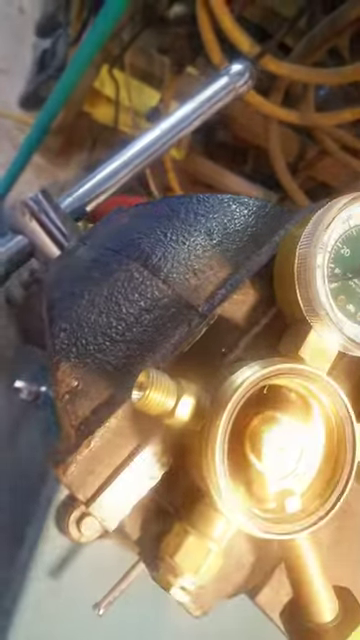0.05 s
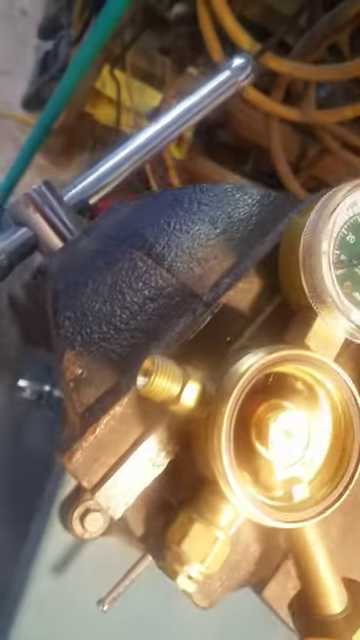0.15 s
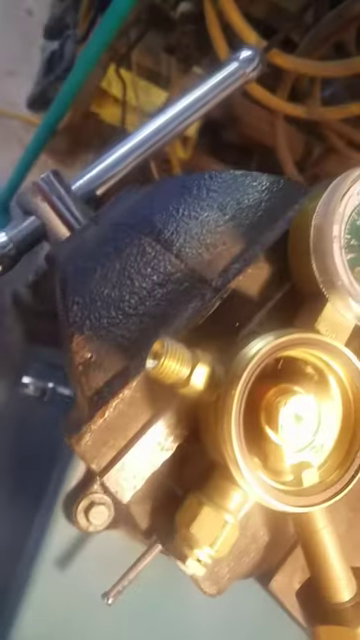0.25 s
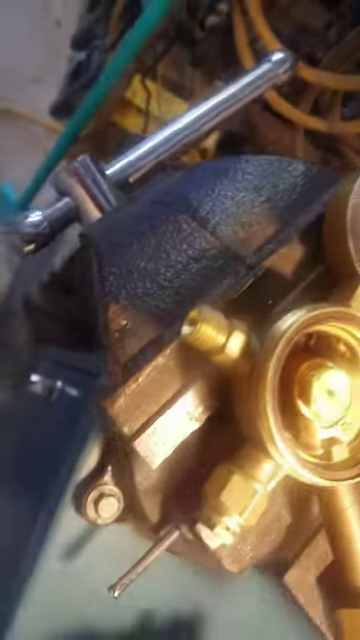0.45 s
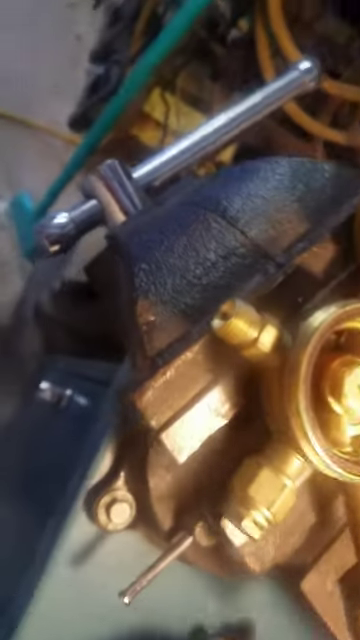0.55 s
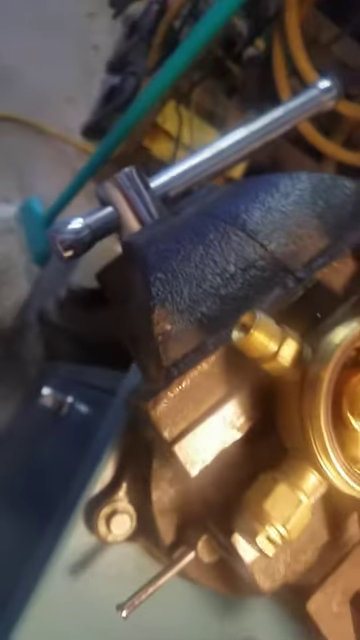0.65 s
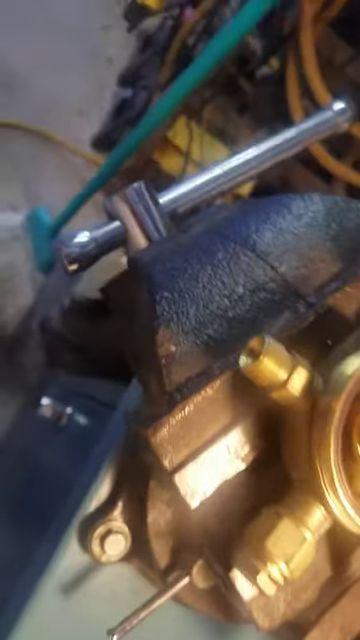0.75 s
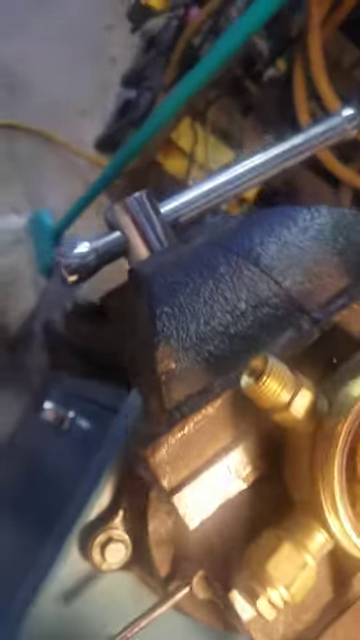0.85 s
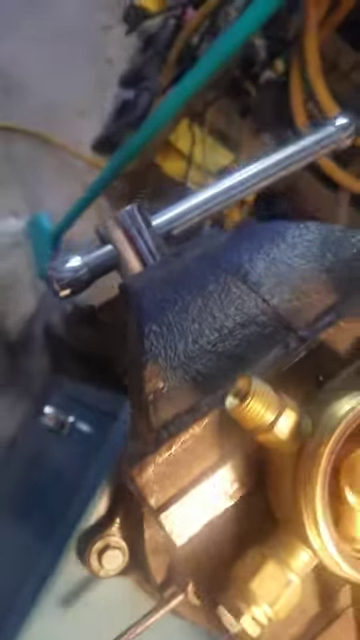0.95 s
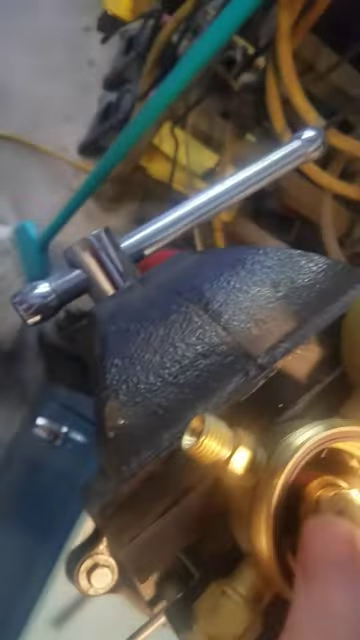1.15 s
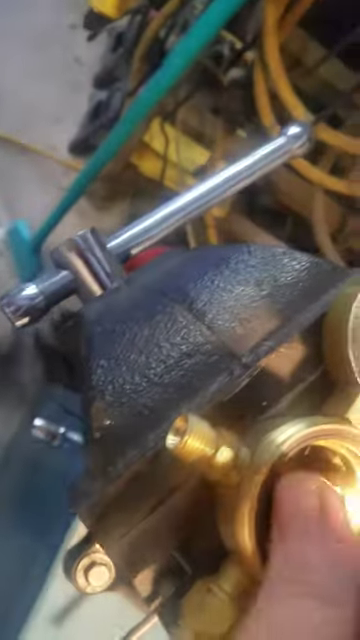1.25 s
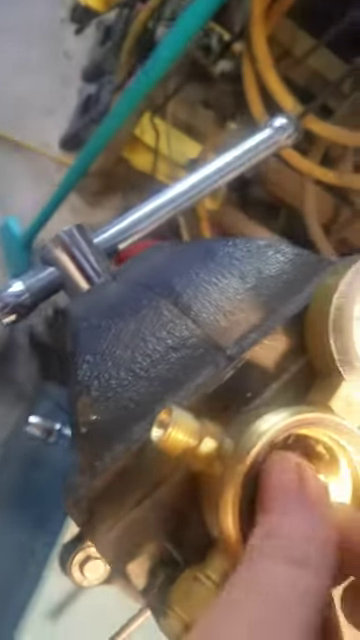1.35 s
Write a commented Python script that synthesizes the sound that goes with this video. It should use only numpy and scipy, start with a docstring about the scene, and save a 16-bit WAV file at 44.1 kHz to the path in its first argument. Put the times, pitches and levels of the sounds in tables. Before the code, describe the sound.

A metal gas regulator clicks sharply and rattles briefly over a faint, steady hiss.

```python
"""A sharp click, then a quick rattle: a metal gas regulator handled close to the microphones in a workshop.
Each contact is a crack, a short clatter of parts and a faint ring of the body, in a small room.
A loose part gives a tiny double tick, then the handle knocks softly a few times.
A steady low rush, rumble and faint hiss lie underneath."""
import sys
import numpy as np
from scipy import signal
from scipy.fft import rfft, irfft, next_fast_len
from scipy.io import wavfile
from scipy.ndimage import map_coordinates

SR = 44100
rng = np.random.default_rng(int(sys.argv[2]) if len(sys.argv) > 2 else 0)


def materialize(psi):
    """Save the field psi as 16-bit PCM at rate SR to the path in sys.argv[1].

    A 1-D psi becomes a single channel; in a 2-D psi each row is a channel.
    """
    bounded = np.clip(np.atleast_2d(psi).T, -1, 1)
    quanta = np.round(bounded * 32767).astype(np.int16)
    wavfile.write(sys.argv[1], SR, quanta)


N = 61739


def clicks():
    """Metal contacts: each one cracks, shakes the parts into a clatter and rings the body."""
    # (time [s], level [dB], thump [dB], bite [dB], treble [dB], clatter [dB])
    contacts = [(.2486, -2.5, 3, 3, -8.5, 2), (0.2857, -1.5, -9, -2, 2, -0.5),
                (0.2985, 1.5, -1.5, -4, 2.5, -1), (.3160, -6.5, 0, 0, -8.5, -0.5)]
    # spectra (frequency [Hz], level [dB])
    crack_spectrum = [(100, -34), (450, -12.5), (700, -3), (900, 1), (1250, 1.5), (1700, 5), (2300, -3.5),
                      (3300, 1), (5400, -2.5), (8000, -9), (11000, -7.5), (15500, -15)]
    clatter_spectrum = [(200, -18), (550, -11), (900, -5.5), (1500, -3.5), (2300, -4.5), (3300, -3.5),
                        (4200, 0.5), (5600, 4), (7500, -9), (11000, -6), (15500, -14.5)]
    # (frequency [Hz], level [dB], t60 [s])
    body_modes = [(730, -7.5, 0.11), (859, -2.5, 0.069), (1086, 3, 0.07), (1173, -7.5, 0.062),
                  (1301, -1.5, 0.041), (1500, 1, 0.028), (1790, -9, 0.049), (2908, -3.5, 0.11),
                  (4420, -4, 0.083), (4900, -6, 0.089), (5250, -13, 0.33), (5550, -4, 0.07),
                  (5720, -5, .22), (6217, -9, 0.26)]
    crack_db, clatter_db, ring_db = 10, 10.5, -35.5
    clatter_t60_s, clatter_rise_s = 0.048, 0.00052
    echo_s, echo_db = 0.0054, -15  # off a nearby surface
    low_cut_hz = 260  # small parts radiate no bass
    out, t = np.zeros((2, N)), np.arange(SR // 2) / SR
    crack = snap(crack_spectrum, t)
    crack = filtered(crack, lambda hz: 1 + amp(echo_db) * np.exp(-2j * np.pi * hz * echo_s))
    for start_s, db, thump_db, bite_db, treble_db, shake_db in contacts:
        shake = diffuse_noise(len(t)) * amp(-60 * t / clatter_t60_s) * (1 - np.exp(-t / clatter_rise_s))
        shake /= np.linalg.norm(shake, axis=1, keepdims=True)
        clatter = amp(clatter_db + shake_db) * coloured(shake, clatter_spectrum)
        hit = amp(crack_db) * crack + clatter + amp(ring_db) * ring(body_modes, t)
        tone = [(810, thump_db), (1610, 0), (3400, bite_db), (5500, 0), (11000, treble_db)]  # [Hz], [dB]
        add(out, start_s, amp(db) * in_room(coloured(hit, tone)))
    return signal.sosfilt(signal.butter(2, low_cut_hz, "highpass", fs=SR, output="sos"), out)


def snap(spectrum, t):
    """One impulse carried by bending waves in the metal: treble arrives first."""
    delay_s, ref_hz = 0.00013, 1000  # group delay at ref_hz
    impulse = coloured(1.0 * (t == 0), spectrum)
    return filtered(impulse, lambda hz: np.exp(-4j * np.pi * delay_s * np.sqrt(hz * ref_hz)))


def ring(modes, t, scatter_db=1):
    """Decaying modes struck together; their levels vary from blow to blow."""
    return sum(amp(db + scatter_db * rng.standard_normal() - 60 * t / t60_s) * np.cos(2 * np.pi * hz * t)
               for hz, db, t60_s in modes)


def ticks():
    """A loose part touches too lightly to clatter: a bare snap each time."""
    # (time [s], level [dB])
    contacts = [(0.6671, -22), (0.6703, -21)]
    # (frequency [Hz], level [dB])
    spectrum = [(200, -15), (1200, 3.5), (3000, -3.5), (4200, 2), (5200, 5.5), (7500, -6), (11000, -7),
                (15500, -10)]
    out, t = np.zeros((2, N)), np.arange(SR // 2) / SR
    for start_s, db in contacts:
        add(out, start_s, amp(db) * in_room(snap(spectrum, t)))
    return out


def knocks():
    """Soft contacts excite only the handle's low modes."""
    # (time [s], level [dB])
    contacts = [(.742, -53), (0.799, -47), (.838, -40.5), (1.097, -53)]
    # (frequency [Hz], level [dB], t60 [s])
    handle_modes = [(944, -6.5, 0.1), (1038, 0.5, 0.1), (1620, -8, 0.057), (2090, -6, .05)]
    rise_s = 0.0026
    out, t = np.zeros((2, N)), np.arange(SR // 2) / SR
    for start_s, db in contacts:
        knock = ring(handle_modes, t) * (1 - np.exp(-t / rise_s))
        add(out, start_s, amp(db) * in_room(knock))
    return out


def in_room(x):
    """Direct sound plus the small room's diffuse tail."""
    # (frequency [Hz], t60 [s])
    decay = [(300, 0.3), (1200, 0.08), (3000, 0.33), (6000, 0.45), (11000, 0.4), (15000, 0.3)]
    # (frequency [Hz], level [dB])
    tail_spectrum = [(300, 0), (1200, -14), (3000, -11), (6000, -9), (12000, -7)]
    build_up_s = 0.0034
    band_hz, t, bands = signal.stft(diffuse_noise(SR // 2), SR, nperseg=256)
    t60_s = along(decay, band_hz)[:, None]
    envelope = amp(-60 * t / t60_s) / np.sqrt(t60_s) * (1 - np.exp(-t / build_up_s))
    _, tail = signal.istft(bands * envelope, SR, nperseg=256)
    tail = filtered(tail / np.linalg.norm(tail[0]), lambda hz: amp(along(tail_spectrum, hz)))
    return x + signal.fftconvolve(np.atleast_2d(x), tail, axes=1)[:, :x.shape[-1]]


def at_microphones(x):
    """The regulator is nearer the right microphone, so the left lags; both are dull around 8 kHz."""
    # (frequency [Hz], lag [s])
    left_lag = [(900, 0), (1200, .00007), (1700, .0002), (4400, .00038), (8000, .00042)]
    # (frequency [Hz], gain [dB])
    notch = [(6300, 3), (7200, -6.5), (8200, -8.5), (9100, -10), (10000, 1)]
    lag_share = np.array([[0.5], [-0.5]])
    delayed = filtered(x, lambda hz: np.exp(-2j * np.pi * hz * lag_share * along(left_lag, hz)))
    return coloured(delayed, notch)


def background():
    """Hiss, low rush and rumble, slightly unsteady; they dip after the clicks and slowly return."""
    # (time [s], hiss [dB], rush [dB], rumble [dB])
    levels = [(0, -47.5, -44, -55), (.22, -48, -42.5, -49), (.33, -44.5, -44, -58),
              (.55, -54, -49.5, -53.5), (.8, -55, -47.5, -62), (1.0, -52, -46, -54.5),
              (1.09, -50, -47.5, -47), (1.17, -50.5, -44.5, -56), (1.28, -50, -47.5, -59),
              (1.38, -49, -43, -54)]
    # spectra (frequency [Hz], level [dB])
    hiss = [(350, -39), (600, -5), (1000, -6.5), (1500, -10), (1950, -6.5), (3400, -14), (5500, -13.5),
            (6500, -23.5), (7400, -35), (8400, -47.5), (9600, -29), (11200, -19.5), (16000, -30)]
    rush = [(60, -17.5), (130, -7), (210, -2.5), (290, -3), (360, 0.5), (450, -3.5), (560, -11),
            (800, -18.5), (1500, -55)]
    rumble = [(15, -35), (35, -10.5), (60, -7.5), (85, 0), (110, -8), (180, -22), (400, -68)]
    sways_db = (0.58, 0.46, 1)
    times_s, *curves_db = np.transpose(levels)
    out, t = np.zeros((2, N)), np.arange(N) / SR
    for spectrum, curve_db, sway_db in zip((hiss, rush, rumble), curves_db, sways_db):
        level_db = np.interp(t, times_s, curve_db) + sway_db * wobble(knots_per_s=17.95)
        noise = filtered(diffuse_noise(N), lambda hz: amp(along(spectrum, hz)))
        out += amp(level_db) * noise / np.sqrt(np.mean(noise ** 2))
    return out


def diffuse_noise(size):
    """White noise at two microphones: alike in the bass, unrelated in the treble."""
    # (frequency [Hz], left-right correlation [-1..1])
    correlation = [(30, 0.043), (80, .65), (200, 0.9), (400, 0.88), (800, 0.062), (1500, -0.24),
                   (4000, -0.013), (15000, -0.089)]

    def mid_side_gains(hz):
        angle = np.arccos(along(correlation, hz)) / 2
        return np.array([np.cos(angle), np.sin(angle)])

    mid, side = filtered(rng.standard_normal((2, size)), mid_side_gains)
    return np.array([mid + side, mid - side])


def wobble(knots_per_s):
    """Smooth random curve."""
    return map_coordinates(rng.standard_normal(size=256), [np.arange(N) * knots_per_s / SR], mode="mirror")


def amp(db):
    """Decibels to gain."""
    return 10 ** (np.asarray(db) / 20)


def along(points, hz):
    """Interpolate (frequency [Hz], value) points on a log axis."""
    knots_hz, values = np.transpose(points)
    return np.interp(np.log(hz + 1), np.log(knots_hz + 1), values)


def filtered(x, response):
    """Apply a complex response(hz)."""
    n = x.shape[-1]
    padded = 2 * next_fast_len(n)
    return irfft(rfft(x, padded) * response(np.fft.rfftfreq(padded, 1 / SR)), padded)[..., :n]


def coloured(x, spectrum):
    """Minimum-phase filter through (frequency [Hz], gain [dB]) points."""
    def response(hz):
        cepstrum = irfft(np.log(amp(along(spectrum, hz))))
        half = len(cepstrum) // 2
        cepstrum[1:half] *= 2
        cepstrum[half + 1:] = 0
        return np.exp(rfft(cepstrum))

    return filtered(x, response)


def add(track, start_s, sound):
    """Mix a sound into the track."""
    part = track[:, round(start_s * SR):][:, :sound.shape[-1]]
    part += sound[..., :part.shape[-1]]


def scene():
    """The regulator in its room, over the background."""
    return at_microphones(clicks() + ticks() + knocks()) + background()


def record(dry):
    """The microphones differ in colour; the recorder rounds the highest peaks and cuts the top."""
    # (frequency [Hz], left minus right [dB])
    balance = [(300, -2), (700, -2.5), (900, 2), (1200, 1), (1700, 8.5), (2500, 4.5), (3400, 4.5),
               (5200, 3), (8000, -4.5), (11000, -4), (15000, -4)]
    top_hz = 15900
    balance_share = np.array([[0.5], [-0.5]])
    heard = filtered(dry, lambda hz: amp(balance_share * along(balance, hz)))
    rounded = heard / (1 + heard ** 4) ** 0.25
    return filtered(rounded, lambda hz: 1 / np.sqrt(1 + (hz / top_hz) ** 160))


dry = scene()
out = record(dry)
materialize(out)
```